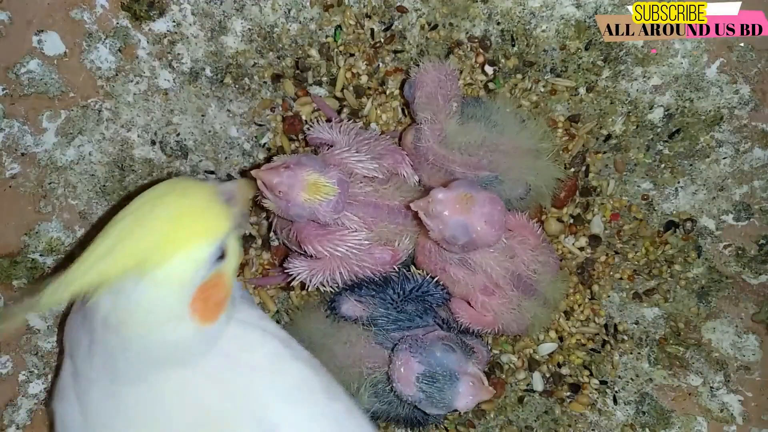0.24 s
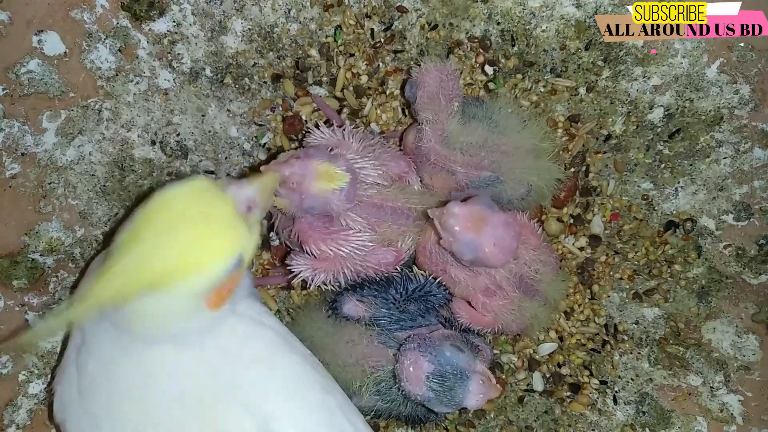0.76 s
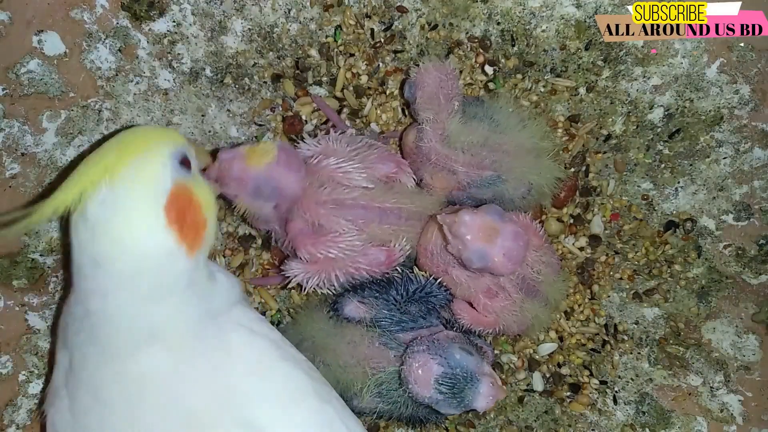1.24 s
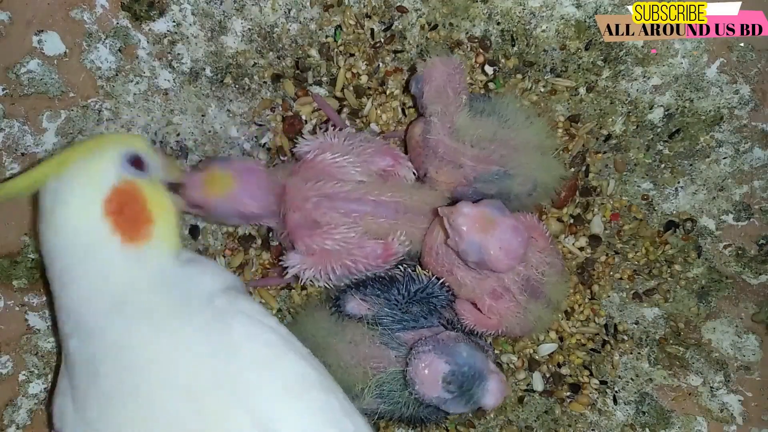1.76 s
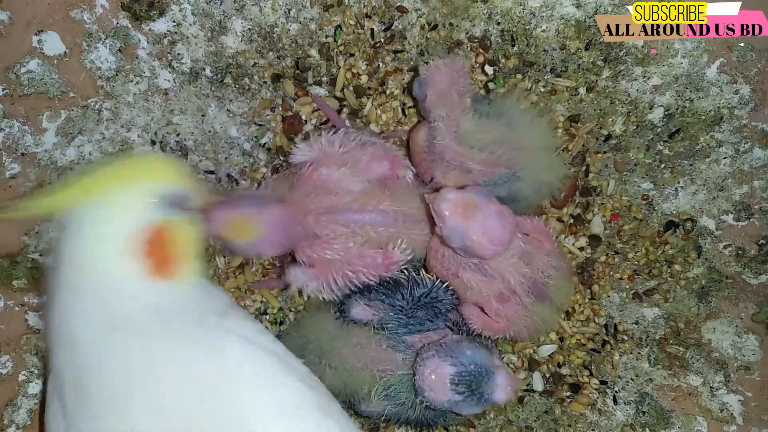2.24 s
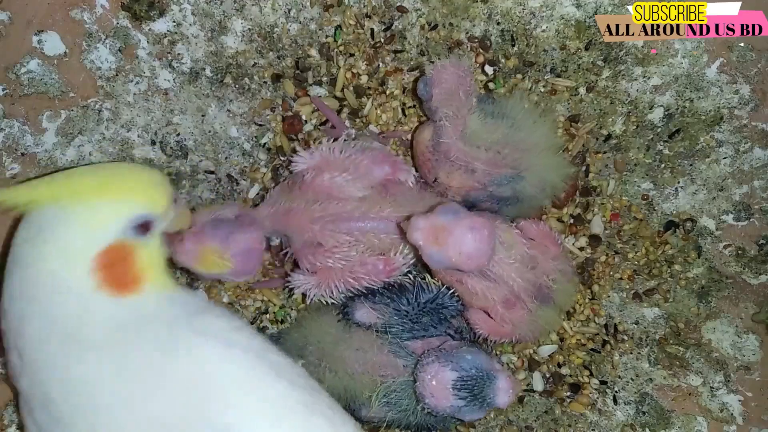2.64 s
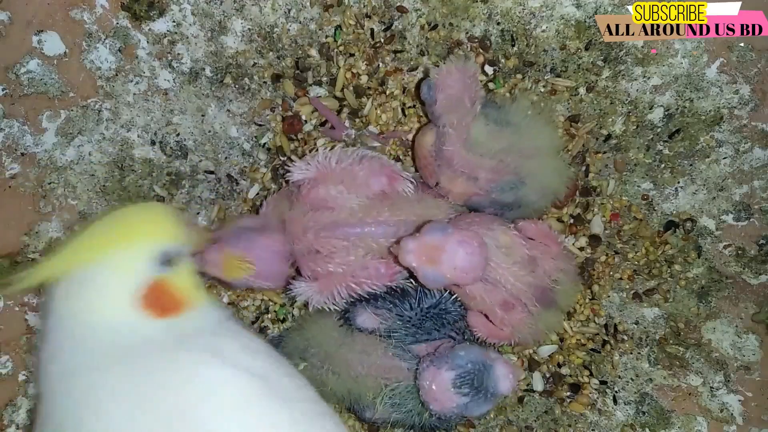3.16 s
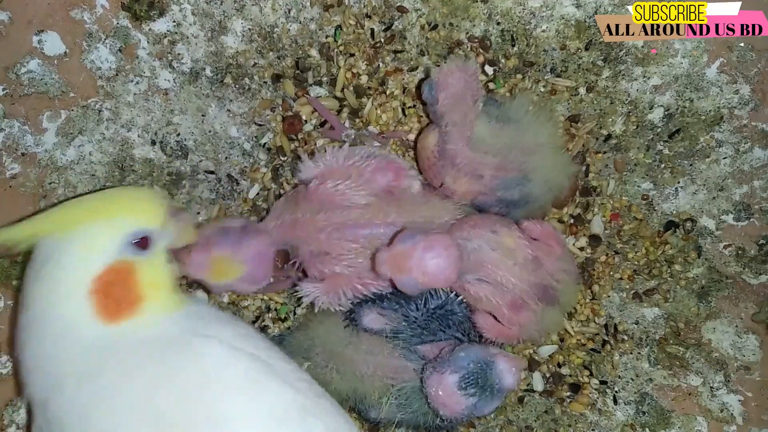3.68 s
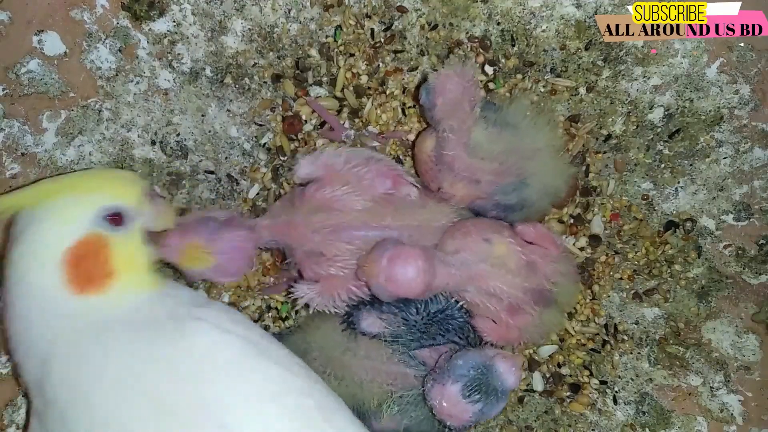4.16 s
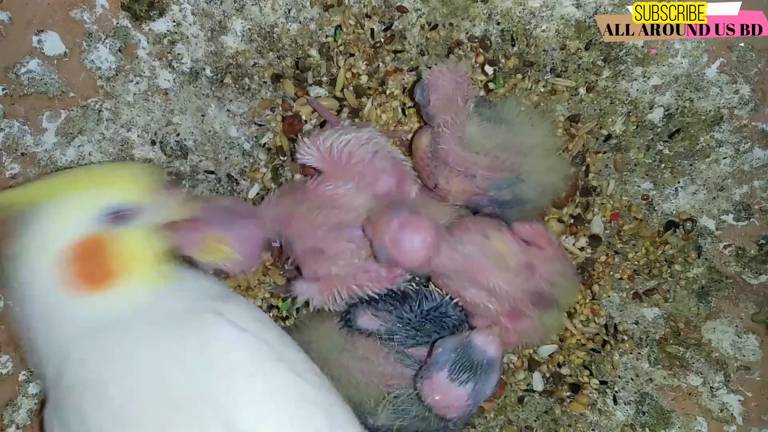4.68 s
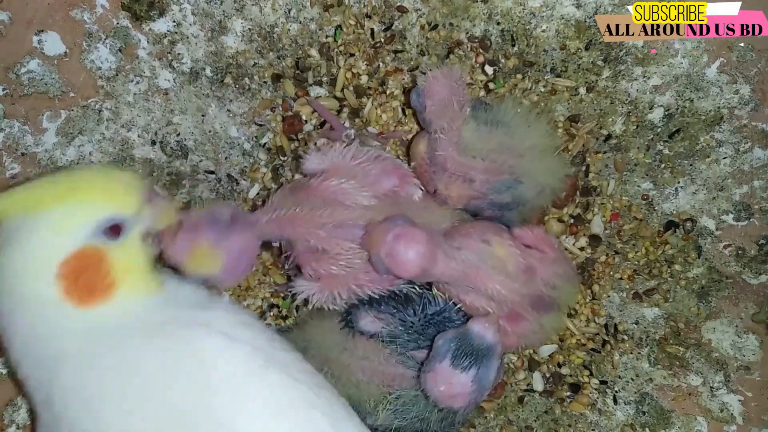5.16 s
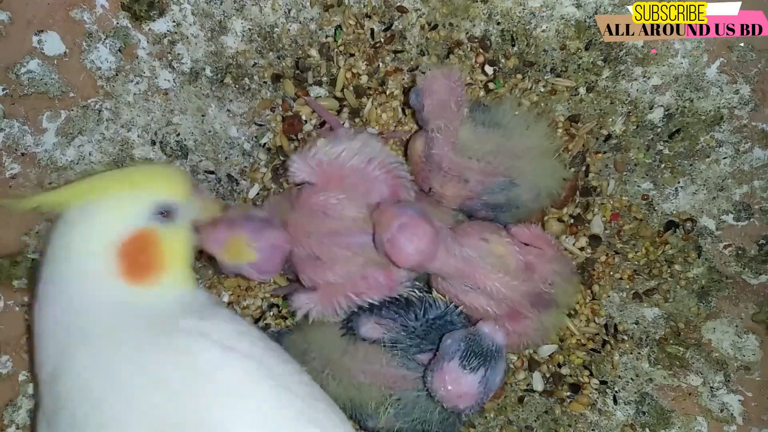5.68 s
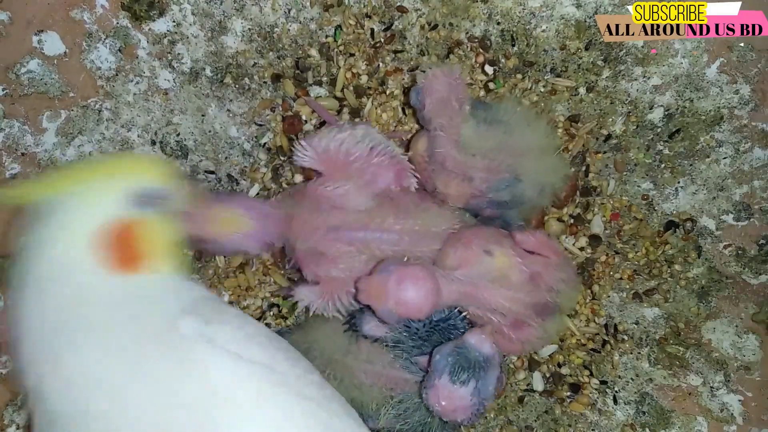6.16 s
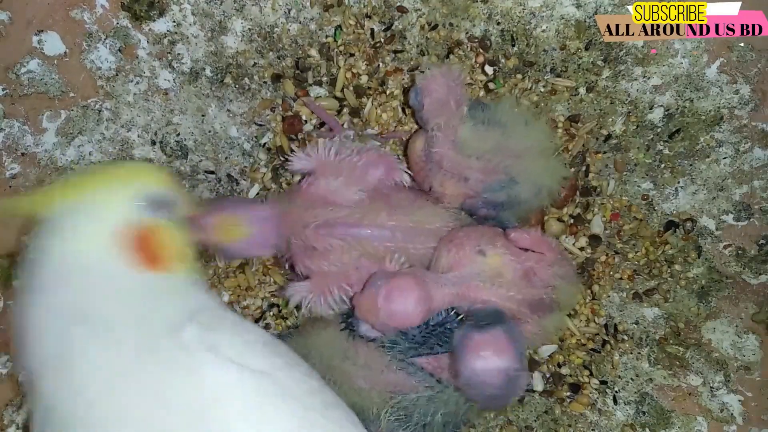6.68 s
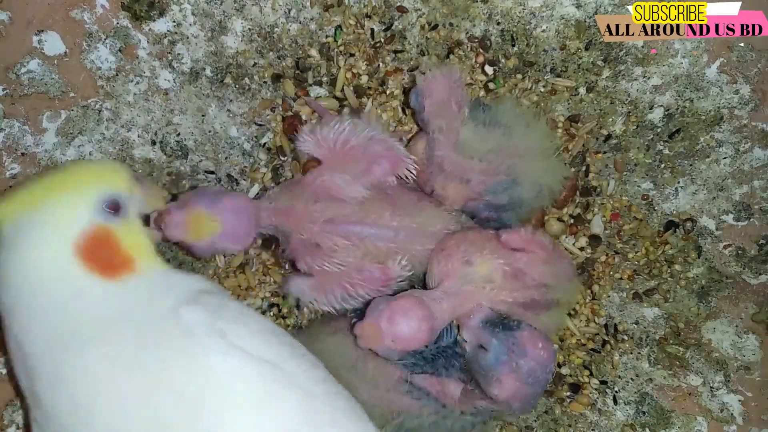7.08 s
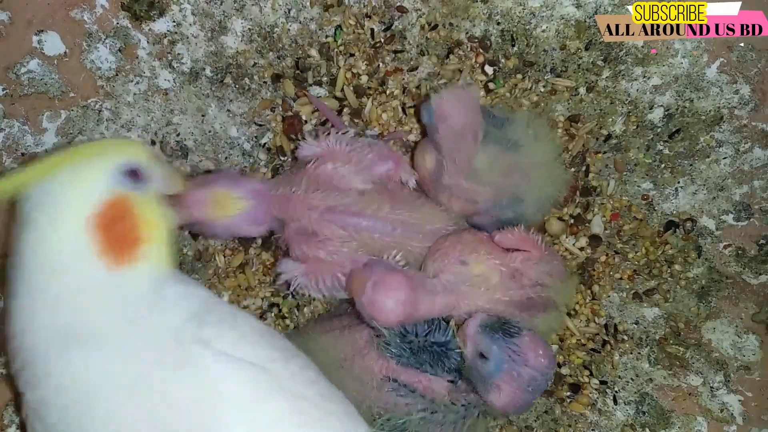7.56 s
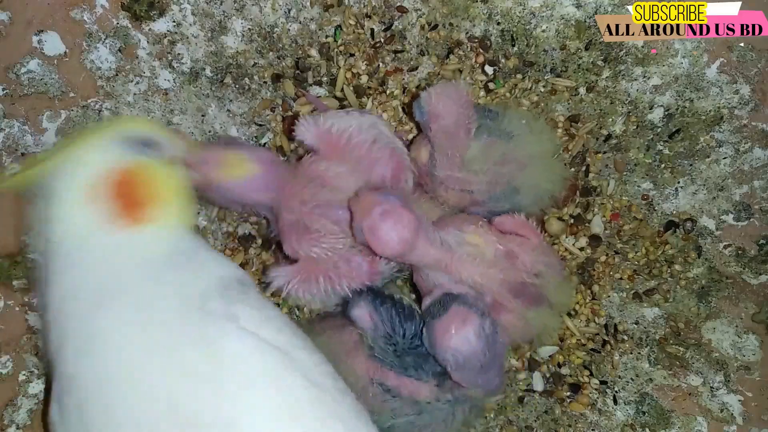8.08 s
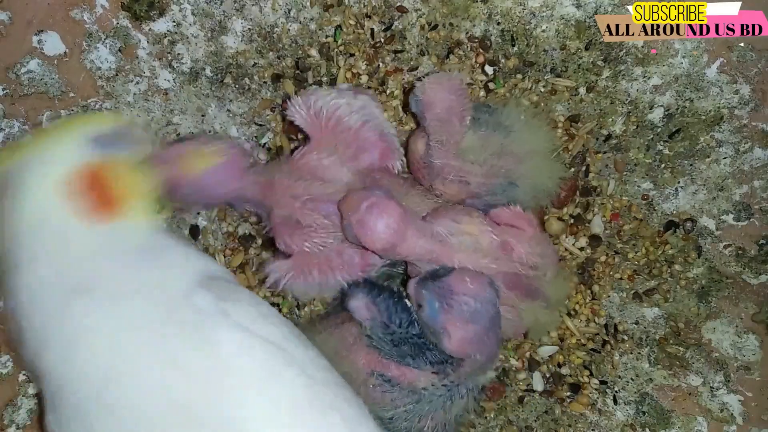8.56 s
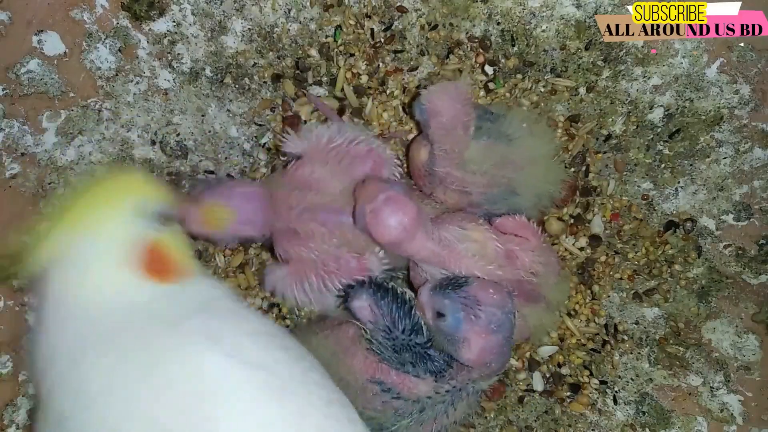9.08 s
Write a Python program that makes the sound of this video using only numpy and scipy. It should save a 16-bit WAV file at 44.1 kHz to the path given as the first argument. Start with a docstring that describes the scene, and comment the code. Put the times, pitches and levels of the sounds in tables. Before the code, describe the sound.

Quiet hum and hiss, slight rustling and ticking for over a second, then rapid shrill chirps from a baby parrot being fed by its parent. The chirps swell, thin out midway, then return brighter and higher until the end. A very faint metallic ring sounds once far away. Small stereo microphone close to the chick, in a boxy space with a short room tail.

```python
"""Inside a nest box, recorded close by on a small stereo microphone, its right port facing a parrot chick.
Room air comes first, as random spectra; noise rustles the litter, dying modes tick and knock, on and off.
From 1.4 s the chick peeps nearly seven times a second while a parent pumps food into its beak: each peep
is a held high sine whistle that drops, with a box jolt of low noise, wall echoes and a room tail.
At about 3 s two faint metallic sines ring once, far off, under the peeps, which last to 9.3 s."""
import sys
import numpy as np
from scipy import signal
from scipy.fft import rfft, irfft, next_fast_len
from scipy.io import wavfile
from scipy.ndimage import uniform_filter1d

SR = 44100
rng = np.random.default_rng(int(sys.argv[2]) if len(sys.argv) > 2 else 0)


def digitize_waveform(pressure):
    """Quantize a signal to 16-bit integers and store it at the path in sys.argv[1].

    Rows of a 2-D input are taken as channels; values are limited to [-1, 1].
    """
    field = np.atleast_2d(pressure).T
    bounded = np.clip(field, -1, 1)
    quanta = np.round(bounded * 32767).astype(np.int16)
    wavfile.write(sys.argv[1], SR, quanta)


N = 411453  # samples

# All levels are relative: they are set before panning, grain and microphone.
# Room air spectrum: pitch_hz [Hz], density_db [dB per Hz]
AIR_SPECTRUM = [(30, -124), (70, -116), (110, -100), (160, -85), (240, -92.5), (310, -83.5), (390, -107),
                (520, -91), (1070, -88.5), (1280, -100), (1405, -87), (1520, -100), (2200, -107),
                (4500, -107), (8000, -110), (12000, -120)]
# Likeness of the room air at the two ports: pitch_hz [Hz], likeness [0-1]
AIR_LIKENESS = [(60, 0.033), (130, 0.8), (640, 0.52), (1400, 0.053)]
# Balance of the room air: pitch_hz [Hz], left_minus_right_db [dB]
AIR_BALANCE = [(130, -7.5), (290, 2), (640, -3.5), (7000, -4)]
# Decay of the room tail: pitch_hz [Hz], t60_s [s]
ROOM_DECAY = [(500, 0.51), (2600, 0.19), (7000, 0.18)]
# Room tail, one row a port, left then right: level_db [dB]
ROOM_LEVEL = [
    [-25],
    [-17],
]
# Far metallic ring: pitch_hz [Hz], level_db [dB], t60_s [s]
PING_LINES = [(2806, -49, 1.1), (3200, -62.5, .8)]
# Resonances of the whole box when shaken: pitch_hz [Hz], width_hz [Hz], level_db [dB]
BOX_MODES = [(182.5, 20, -1.5), (272, 41, 0), (860, 460, -3.5)]
# Litter and feathers rustling: start_s [s], rise_s [s], body_db [dB], hiss_db [dB]
RUSTLE_EVENTS = [(0.611, 0.0013, -57, -44), (1.043, 0.0056, -52, -46), (1.579, 0.013, -60.5, -48.5),
                 (4.077, 0.0036, -52, -62), (4.988, 0.0041, -52.5, -65), (5.488, 0.0085, -47.5, -53),
                 (5.895, 0.0093, -45, -45), (5.972, 0.0043, -72, -48), (6.408, 0.0048, -52.5, -57),
                 (6.69, 0.002, -70.5, -39.5), (6.708, 0.0079, -75, -35.5), (6.717, 0.0029, -37, -52),
                 (7.43, 0.009, -53.5, -50.5), (7.78, 0.0086, -41.5, -42.5), (8.103, 0.0058, -51, -46.5),
                 (8.412, 0.0056, -42.5, -48), (8.96, 0.0095, -51, -68)]
# Hollow box floor: pitch_hz [Hz], width_hz [Hz], level_db [dB]
FLOOR_MODES = [(1010, 300, 10.5), (1590, 230, 9), (2370, 600, -4)]
# Dry husks: pitch_hz [Hz], width_hz [Hz], level_db [dB]
HUSK_MODES = [(3060, 1700, -17), (4270, 1200, -2), (6140, 4100, 2.5)]
# Seed ticks: start_s [s], level_db [dB], pitch_hz [Hz], t60_s [s]
SEED_TICKS = [(0.221, -38, 2180, 0.017), (0.2462, -40.5, 2190, 0.026), (3.779, -38, 2350, 0.012)]
# A claw hits the box wall: start_s [s], level_db [dB]
CLAW_KNOCKS = [(0.608, -64), (1.051, -46)]
# Ringing of the knocked wall: pitch_hz [Hz], level_db [dB], t60_s [s]
WALL_MODES = [(2630, -0.5, .07), (2780, -9, 0.21), (4060, -4, 0.16), (5700, -12, 0.026), (5860, -10, 0.18),
              (7300, -12, .12)]
# Peeps: start_s [s], start_hz [Hz], knee_hz (end of hold) [Hz], hold_s [s], hold_db [dB], drop_db [dB]
PEEP_EVENTS = [(1.3692, 5220, 4580, 0.015, -33.5, -87), (1.5521, 4900, 5150, 0.0035, -23.5, -24.5),
               (1.7213, 5320, 4996, 0.01, -19.5, -24), (1.8804, 5200, 5110, 0.0082, -15.5, -25),
               (2.0265, 4974, 5250, 0.0098, -17, -18.5), (2.1812, 5160, 5270, 0.012, -18.5, -21),
               (2.3362, 5265, 5130, 0.0061, -17.5, -22.5), (2.48, 5030, 5250, 0.011, -19.5, -21),
               (2.6335, 4994, 5035, 0.0049, -17, -18.5), (2.7765, 5230, 5044, 0.0098, -17.5, -17.5),
               (2.9296, 5345, 5025, 0.011, -14.5, -16), (3.0803, 5400, 5480, 0.0087, -13, -13),
               (3.233, 5636, 5450, 0.012, -13.5, -14.5), (3.387, 5434, 5343, .01, -15.5, -20),
               (3.5307, 5400, 5176, 0.01, -18, -20), (3.6788, 5430, 5235, 0.011, -15.5, -18),
               (3.8365, 5240, 5280, 0.0037, -18, -16), (3.9799, 5480, 5234, 0.0078, -20, -14),
               (4.119, 5440, 5530, 0.013, -22.5, -16), (4.273, 5515, 5350, 0.0088, -19.5, -16.5),
               (4.417, 5730, 5690, 0.01, -21, -14.5), (4.5656, 5690, 5670, 0.01, -26, -15.5),
               (4.714, 5550, 5480, 0.0067, -28, -14.5), (4.855, 5330, 5580, 0.011, -34, -23),
               (5.007, 5260, 5250, 0.0042, -28.5, -29), (5.159, 5360, 5010, 0.0016, -26, -20),
               (5.2929, 5530, 5700, 0.011, -29, -23.5), (5.4443, 5840, 5850, 0.01, -21, -21),
               (5.5923, 5820, 5970, 0.011, -15.5, -20), (5.7405, 5950, 5930, 0.012, -12.5, -17),
               (5.8847, 5880, 5800, 0.013, -14, -23.5), (6.0341, 6190, 5500, .011, -14, -22.5),
               (6.1781, 5590, 5550, 0.012, -18, -17), (6.3257, 6590, 5480, 0.012, -16.5, -25.5),
               (6.47, 5910, 5865, 0.013, -14.5, -24.5), (6.616, 5840, 5700, 0.015, -17.5, -21.5),
               (6.771, 6094, 6035, 0.01, -19, -12), (6.9252, 5950, 5805, 0.015, -12.5, -23),
               (7.0702, 5910, 5845, 0.02, -10, -18.5), (7.2203, 5890, 6120, 0.014, -12, -27),
               (7.3707, 6010, 6000, 0.014, -12, -24), (7.5173, 5900, 6000, 0.012, -13, -23),
               (7.665, 6030, 6170, 0.013, -12.5, -33), (7.8171, 6177, 6164, 0.012, -11, -26.5),
               (7.9712, 6186, 5980, 0.012, -12, -23.5), (8.1195, 6500, 6040, .0093, -14.5, -23.5),
               (8.2655, 6700, 5680, 0.013, -19, -46), (8.42, 5870, 5810, 0.0078, -19.5, -24),
               (8.568, 6230, 6060, 0.0085, -19.5, -23.5), (8.7201, 6080, 6350, 0.004, -19.5, -25.5),
               (8.8583, 6190, 5750, 0.013, -24, -17), (9.016, 6340, 5830, 0.0046, -12.5, -17),
               (9.1533, 6440, 5650, .017, -13.5, -17), (9.3, 5925, 6085, .016, -13.5, -16.5)]
# Peeps change as the heads move: time_s [s], swell_db (over the hold) [dB], end_db [dB],
# octave_db [dB], left_minus_right_db (in the drop) [dB]
HEAD_DRIFT = [(1.37, 0, -59, -50, -11), (1.75, 3, -51.5, -37, -16), (2.5, 5, -36, -34, -11.5),
              (3.3, 7, -42.5, -35.5, -8.5), (4.2, 2, -36.5, -33.5, -10), (4.95, 0, -46, -40.5, -16.5),
              (5.6, 8, -34, -34, -9.5), (6.4, 4, -33, -35.5, -7.5), (7.0, 10, -32.5, -43.5, -9),
              (7.6, 3.5, -29.5, -39, -8.5), (8.3, 2.5, -34, -36, -11.5), (8.8, 9.5, -36, -34.5, -13),
              (9.3, 7, -30.5, -40, -6.5)]
# The open beak favours the octave near its resonance: pitch_hz [Hz], level_db [dB]
BEAK_RESONANCE = [(6000, -5), (7000, -0.5), (8300, -3.5), (9300, -8.5), (11000, -4)]
# The parent's head hides the held whistle from the left port: pitch_hz [Hz], left_minus_right_db [dB]
HEAD_SHADOW = [(5300, -17), (6000, -26.5)]
# Air hissing past the beak: pitch_hz [Hz], width_hz [Hz], level_db [dB]
WHEEZE_MODES = [(4644, 500, 0.013), (8200, 4500, 0.0064)]
# Wall echoes of the nest box: left_delay_s [s], left_db [dB], right_delay_s [s], right_db [dB]
WALL_ECHOES = [(.0011, -43, 0.000926, -15.5), (.0021, -8.5, 0.0025, -14.5)]
# Microphone response: pitch_hz [Hz], level_db [dB]
MIC_RESPONSE = [(40, -13.5), (120, 3), (7900, 4), (8600, -7.5), (15000, -11)]
# Faint shifted copies from a 48 to 44.1 kHz change: shift_hz [Hz], level_db [dB]
MIRROR_SHIFTS = [(-3900, -35.5), (3889.5, -37), (7804, -48.5)]

# Far ring: it swells, then is damped by a few dB
PING_S, PING_RISE_S, PING_DAMPED_S, PING_DAMP_DB = 2.95, 0.025, 0.19, -6
# Every drop ends on one pitch; its mean speed is the same throughout
DROP_TO_HZ, FALL_HZ_PER_S = 3244, 215000
SETTLE_HZ, SETTLE_AT = 3722, 0.62  # the fall slows at this pitch, after this share of the drop
ACCENT_AT = (0.15, 0.48)  # range of shares of the drop at which drop_db is reached
LEAD_S, LEAD_DB, LEAD_HZ = 0.0026, -7.5, 350  # soft lead-in, starting this much higher
LINGER_S, LINGER_HZ, LINGER_DB = 0.0031, 3050, -9  # weak last note below the fall
FLUTTER, FLUTTER_HZ, FLUTTER_FADE_S = 0.38, (223, 460), 0.018  # depth, range of rates, fading time
WHEEZE_DB = -29  # below the whistle
EDGE_HZ = 15650  # upper band limit


def gain_of(db):
    """Decibels to gain."""
    return 10 ** (np.asarray(db) / 20)


def read(points, hz):
    """Reads a table on a log-frequency axis."""
    f, value = np.transpose(points)
    return np.interp(np.log(hz + 1), np.log(f + 1), value)


def add(mix, s, sound):
    """Adds a two-channel sound at time s."""
    part = mix[:, round(s * SR):][:, :sound.shape[1]]
    part += sound[:, :part.shape[1]]


def bands(noise, modes):
    """Noise through a few wide resonances, brought to rms 1 over both channels."""
    out = 0
    for hz, width, db in modes:
        out = out + gain_of(db) * signal.lfilter(*signal.iirpeak(hz, hz / width, SR), noise)
    return out / np.sqrt(np.mean(out ** 2))


def air():
    """Distant hum and hiss: random short-time spectra with drifting patches."""
    frames, hz = N // 256 + 5, np.fft.rfftfreq(1024, 1 / SR)
    a, b, c, d, patches = rng.standard_normal((frames, 513, 5)).T
    patches = uniform_filter1d(patches, size=14, axis=0)  # across frequency
    patches = uniform_filter1d(patches, size=12, axis=1)  # across time
    likeness = np.clip(read(AIR_LIKENESS, hz), -1, 1)[:, None]
    pan_db = read(AIR_BALANCE, hz)[:, None]
    left = a + 1j * b
    right = likeness * left + np.sqrt(1 - likeness ** 2) * (c + 1j * d)
    spectra = np.array([left * gain_of(pan_db / 2), right * gain_of(-pan_db / 2)])
    spectra *= gain_of(read(AIR_SPECTRUM, hz)[:, None] + 18 * patches) * np.sqrt(SR / 1024)
    return signal.istft(spectra, nperseg=1024, noverlap=768)[1][:, :N]


def room(x):
    """Three sparse tails of scattered reflections take turns, treble and bass dying at their own rates."""
    out = np.zeros((2, N))
    for turn in range(3):
        taps = np.zeros((2, SR // 2))
        # one reflection, of random sign, somewhere in every 20 samples
        at = np.arange(260, SR // 2 - 20, 20) + rng.integers(0, 20, (2, (SR // 2 - 261) // 20))
        np.put_along_axis(taps, at, rng.choice([-1., 1.], at.shape), 1)
        hz, t, spectra = signal.stft(taps, SR, nperseg=256)
        decay = gain_of(-60 * t / read(ROOM_DECAY, hz)[:, None])
        tail = signal.istft(spectra * decay, SR, nperseg=256)[1]
        tail = tail / np.linalg.norm(tail[0])
        share = np.sqrt(2 / 3) * np.cos(np.pi * (2.3 * np.arange(N) / SR + turn / 3))
        out += signal.fftconvolve(share * x[None], tail, axes=1)[:, :N]
    return gain_of(ROOM_LEVEL) * out


def ping():
    """Far metal: two thin, wavering sine modes that swell quickly and die away."""
    out, t = np.zeros((2, N)), np.arange(SR) / SR
    waver = 1 + 9 * uniform_filter1d(rng.standard_normal((len(PING_LINES), SR)), size=900)
    ring = 0
    for w, (hz, db, t60) in zip(waver, PING_LINES):
        ring = ring + w * gain_of(db - 60 * t / t60) * np.sin(2 * np.pi * hz * t)
    damp_db = PING_DAMP_DB * np.clip((t - PING_DAMPED_S) / PING_RISE_S, 0, 1)
    swell = np.minimum(t / PING_RISE_S, 1)
    add(out, PING_S, ring * swell * gain_of(damp_db + np.array([[-2], [2]])))
    return out


def jolts():
    """Every thrust of the feeding heads shakes the box: a soft low puff of resonant noise with each peep."""
    out, t = np.zeros((2, N)), np.arange(SR // 8) / SR
    shape = t / 0.02 * np.exp(1 - t / 0.026)
    for s, *_ in PEEP_EVENTS:
        shake = rng.standard_normal((3, len(t)))
        puff = bands(shake[:2] + shake[2], BOX_MODES)  # half shared by both ports
        add(out, s, gain_of(-65 + 2 * rng.standard_normal()) * shape * puff)
    return out


def litter():
    """Rustles are grainy noise in the box floor and the husks; ticks and knocks are dying modes."""
    out, t = np.zeros((2, N)), np.arange(SR // 2) / SR
    for s, rise, body_db, hiss_db in RUSTLE_EVENTS:
        low, high, grain = rng.standard_normal((3, 2, len(t)))
        grains = gain_of(36 * uniform_filter1d(grain, size=110))
        t60 = 0.081 + 14 * rise  # slower rustles die more slowly
        shape = np.minimum(t / rise, 1) * gain_of(-60 * np.maximum(t - rise, 0) / t60)
        body = bands(grains[0] * (low + low[0]), FLOOR_MODES)
        hiss = bands(bands(grains[1] * high, HUSK_MODES), HUSK_MODES)
        rustle = gain_of(body_db) * body + gain_of(hiss_db) * hiss
        add(out, s, shape * rustle * gain_of([[-3], [3]]))
    knocks = [(s, db + mode_db, hz, t60) for s, db in CLAW_KNOCKS for hz, mode_db, t60 in WALL_MODES]
    for s, db, hz, t60 in SEED_TICKS + knocks:
        ring = gain_of(db - 60 * t / t60) * np.sin(2 * np.pi * hz * t)
        ring = ring * np.minimum(t / 0.0014, 1)
        scraping = 1 + 7 * uniform_filter1d(rng.standard_normal(len(t)), size=150)
        add(out, s, ring * scraping * gain_of([[-3], [1.5]]))
    return out


def peep(s, start_hz, knee_hz, hold, knee_db, drop_db):
    """A held whistle that falls, fluttering, as the syrinx slackens; the octave grows in the fall."""
    times, *columns = np.transpose(HEAD_DRIFT)
    swell_db, end_db, octave_db, pan_db = (np.interp(s, times, column) for column in columns)
    start_db = knee_db - swell_db
    drop = (knee_hz - DROP_TO_HZ) / FALL_HZ_PER_S
    lead, end = min(LEAD_S, hold / 3), hold + drop
    t = np.arange(round((end + LINGER_S + 0.003) * SR)) / SR
    luck, noise = rng.random(4), rng.standard_normal((5, 1800))

    hz = np.interp(t, [0, lead, hold, hold + SETTLE_AT * drop, end, end + LINGER_S],
                   [start_hz + LEAD_HZ, start_hz, knee_hz, SETTLE_HZ, DROP_TO_HZ, LINGER_HZ])
    turns = 2 * np.pi * np.cumsum(uniform_filter1d(hz, size=190, mode="nearest")) / SR

    accent = hold + np.interp(luck[3], [0, 1], ACCENT_AT) * drop
    level_db = [-70, start_db + LEAD_DB, start_db + LEAD_DB, start_db, knee_db,
                drop_db, end_db, end_db + LINGER_DB, -99]
    level = np.interp(t, [0, 0.28 * lead, lead, 1.15 * lead, max(hold - 0.001, 1.4 * lead),
                          accent, hold + 0.85 * drop, end + LINGER_S, end + LINGER_S + 0.0036],
                      gain_of(level_db))

    # the voice breaks and flutters once the pitch slips
    slip = np.clip((t - hold) / 0.001, 0, 1)
    depth = FLUTTER * slip * np.exp(-np.maximum(t - hold, 0) / FLUTTER_FADE_S)
    beat = 2 * np.pi * np.interp(luck[0], [0, 1], FLUTTER_HZ) * (t - hold - 0.001 - 0.001 * luck[1])
    phase = np.array([[2.5 * luck[2] + 1], [0]])  # left, right
    flutter = 1 - depth * (1 + np.cos(beat + phase))

    # turbulent air roughens the whistle
    breath = uniform_filter1d(uniform_filter1d(noise[:3], size=24), size=24)[:, :len(t)]
    side_db = np.interp(t, [hold - 0.002, hold + 0.0012], [read(HEAD_SHADOW, start_hz), pan_db])
    whistle = level * flutter * (1 + (0.3 + 1.8 * slip) * breath[0]) * np.sin(turns)
    whistle = whistle * gain_of([side_db, 0 * t])

    upper_db = octave_db + np.interp(t, [0, hold, hold + 0.96 * drop, end, end + 0.00074],
                                     [-13, -3.5, 0, -8, -31])
    octave = gain_of(upper_db + read(BEAK_RESONANCE, 2 * hz)) * np.sin(2 * turns)
    octave = octave * (1 + (1 + 3 * slip) * breath[1:]) * gain_of([[-5], [0]])

    hiss = bands(bands(noise[3:], WHEEZE_MODES), WHEEZE_MODES)[:, :len(t)]
    wheeze = level * hiss * gain_of(WHEEZE_DB + np.array([[pan_db], [0]]))
    return np.sqrt(2) * (whistle + octave + wheeze)


def chick():
    """All peeps with the close wall echoes that chop the fall into beats; also the right port's direct voice."""
    direct, taps = np.zeros((2, N)), np.zeros((2, 400))
    for s, *row in PEEP_EVENTS:
        add(direct, s - 0.0008, peep(s, *row))
    taps[:, 0] = 1
    for left_s, left_db, right_s, right_db in WALL_ECHOES:
        delay = SR * np.array([[left_s], [right_s]])
        taps += gain_of([[left_db], [right_db]]) * np.sinc(np.arange(400) - delay)
    late = np.pad(direct[0], (7, 0))[:N]  # the left port is farther away
    echoed = signal.oaconvolve(np.array([late, direct[1]]), taps, axes=1)[:, :N]
    return echoed, direct[1]


def scene():
    """Air, far ring, shaken box, litter and chick; the litter and the chick also feed the room tail."""
    peeps, voice = chick()
    rustle = litter()
    tail = room(voice + 4.2 * rustle.mean(0))
    return air() + tail + ping() + jolts() + rustle + peeps


def record(dry):
    """An expander lowers quiet passages; dull microphone, slight overload, mirrors, band limit."""
    power_db = 10 * np.log10(abs(uniform_filter1d((dry ** 2).mean(0), size=200)) + 1e-12)
    fall = np.arange(N) * 298 / SR  # the level follower falls 298 dB a second
    held_db = np.maximum.accumulate(power_db + fall) - fall
    under_db = np.clip(-25 - held_db, 0, 25)
    opened = dry * gain_of(-0.2 * uniform_filter1d(under_db, size=300))
    bent = opened + 0.01 * opened ** 2  # one-sided overload: a faint octave and a low thump

    size = next_fast_len(N)
    response = gain_of(read(MIC_RESPONSE, np.fft.rfftfreq(size, 1 / SR)))
    heard = irfft(rfft(bent, size) * response, size)[:, :N]

    t = np.arange(N) / SR
    shift = sum(gain_of(db) * np.exp(2j * np.pi * hz * t) for hz, db in MIRROR_SHIFTS)
    heard = heard + (signal.hilbert(heard, size)[:, :N] * shift).real
    band_limit = signal.firwin(511, EDGE_HZ, window=("kaiser", 9), fs=SR)
    return signal.oaconvolve(heard, band_limit[None], "same")


dry = scene()
out = record(dry)
digitize_waveform(out)
```